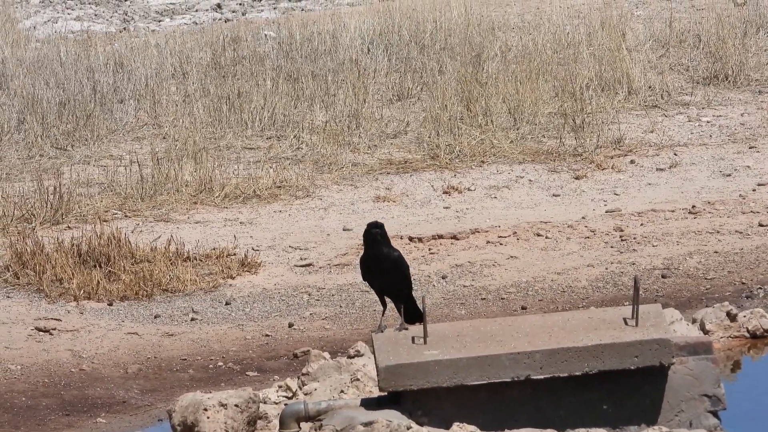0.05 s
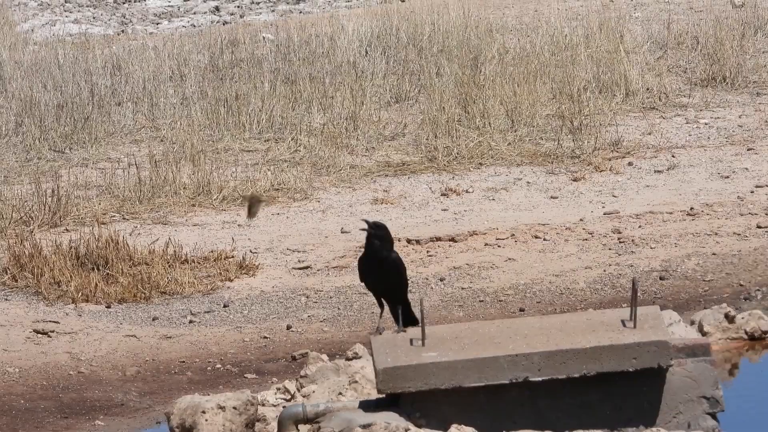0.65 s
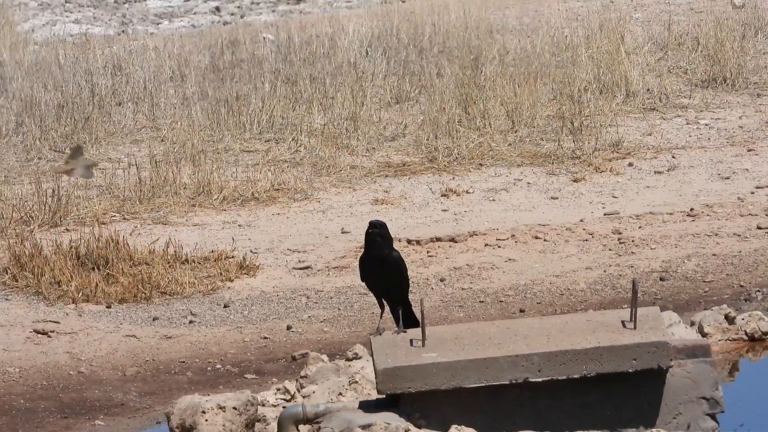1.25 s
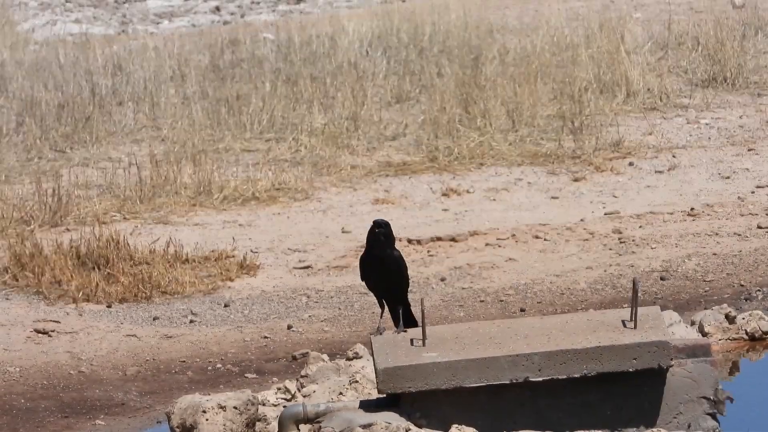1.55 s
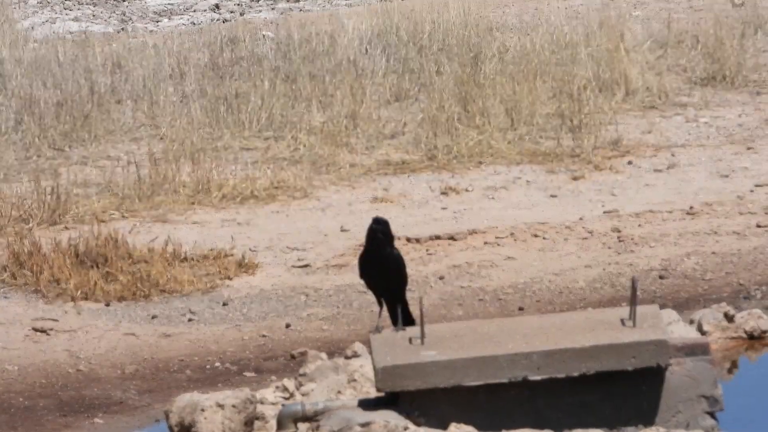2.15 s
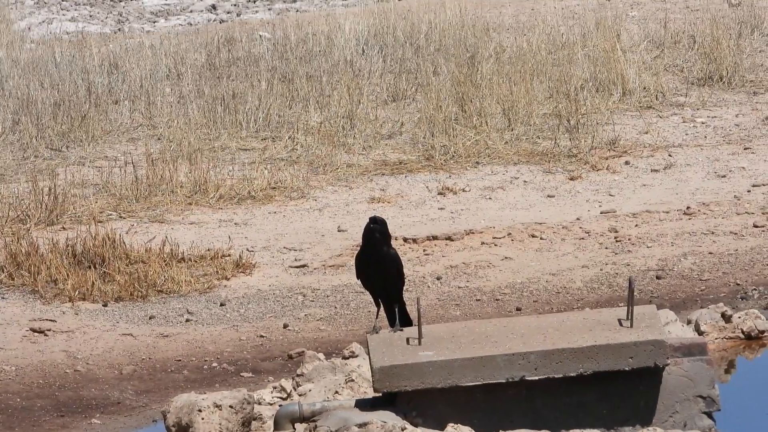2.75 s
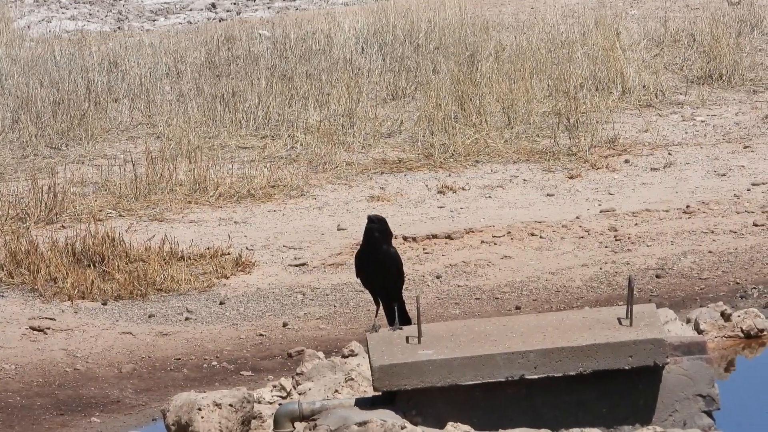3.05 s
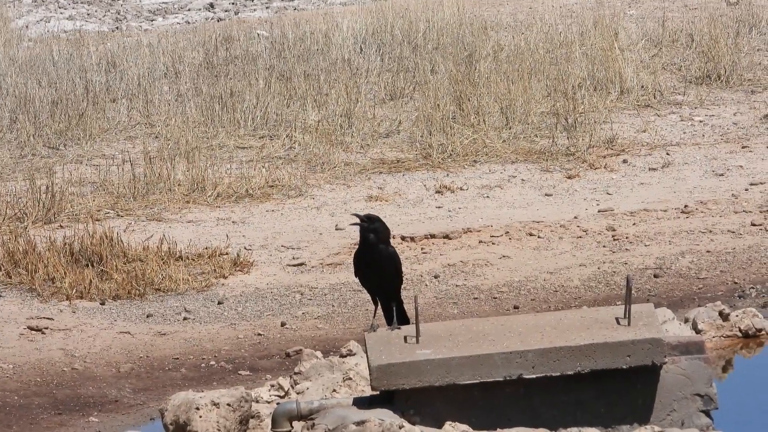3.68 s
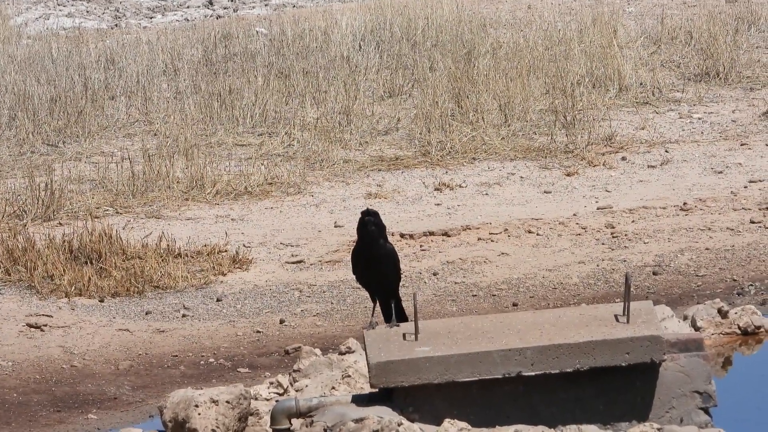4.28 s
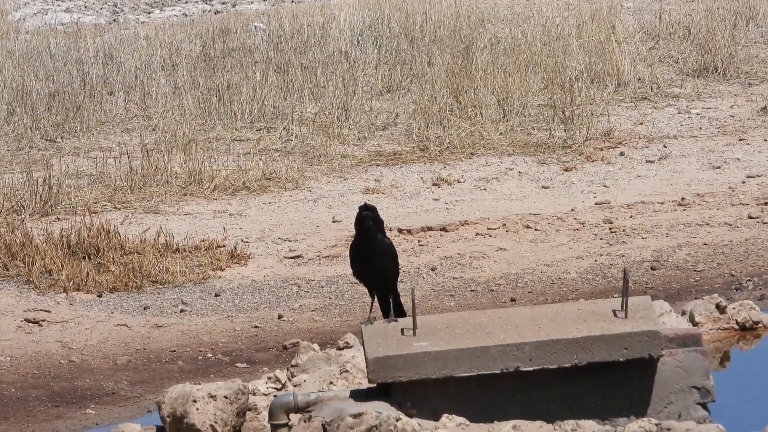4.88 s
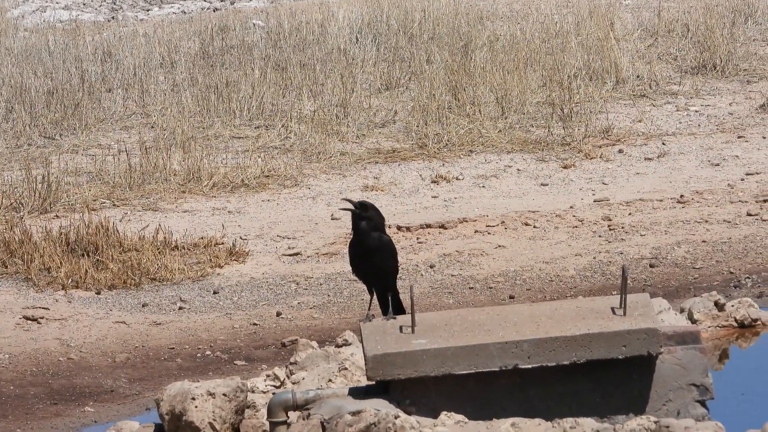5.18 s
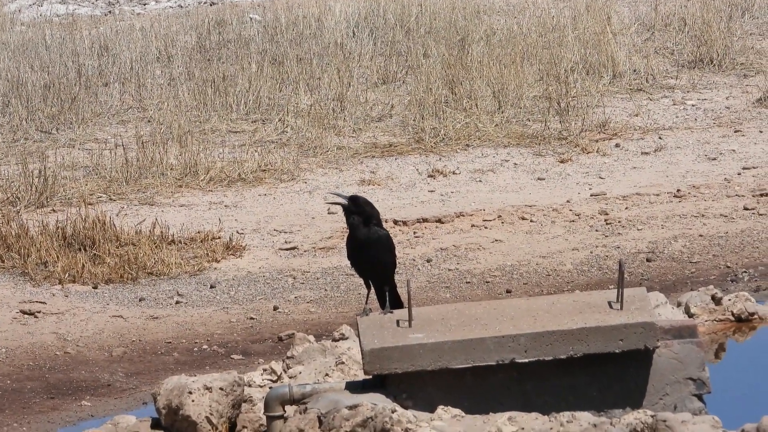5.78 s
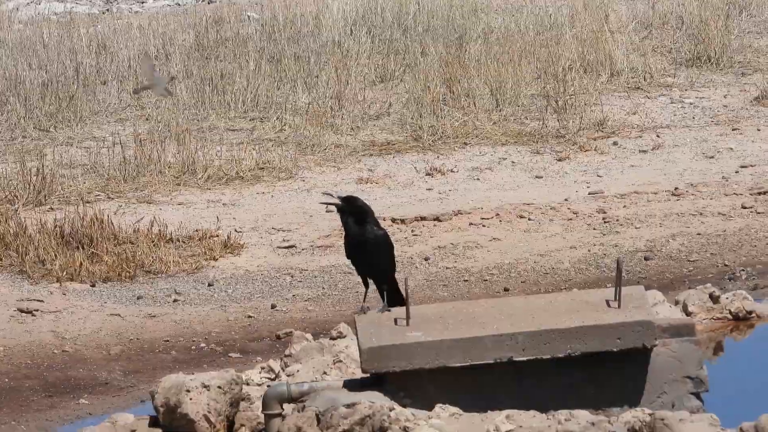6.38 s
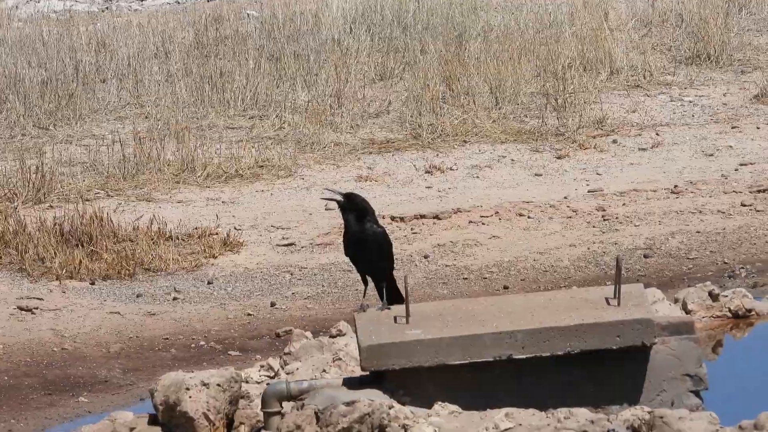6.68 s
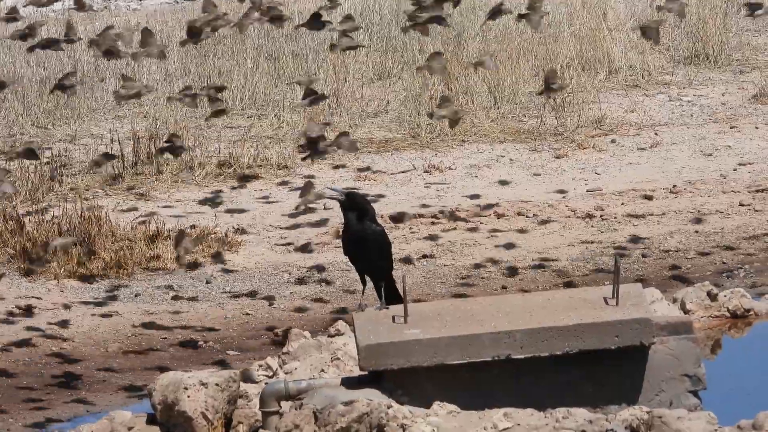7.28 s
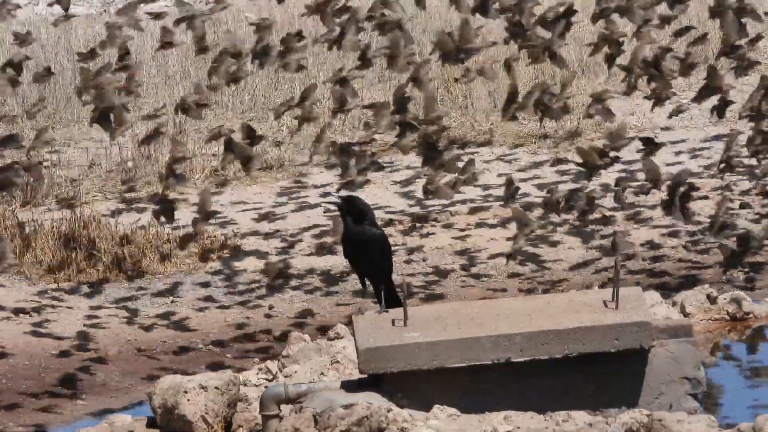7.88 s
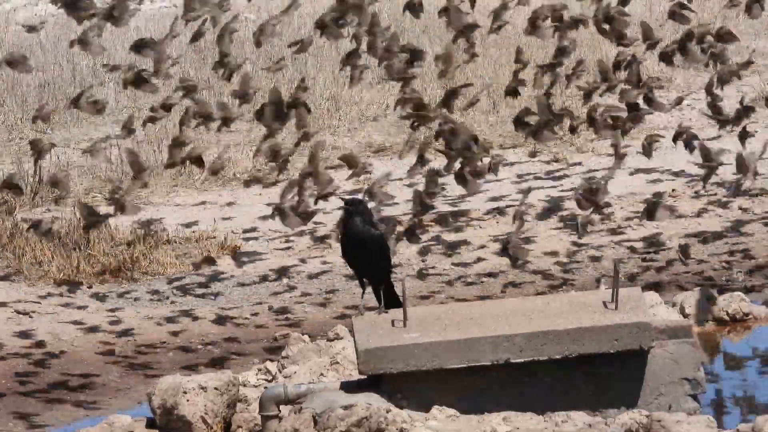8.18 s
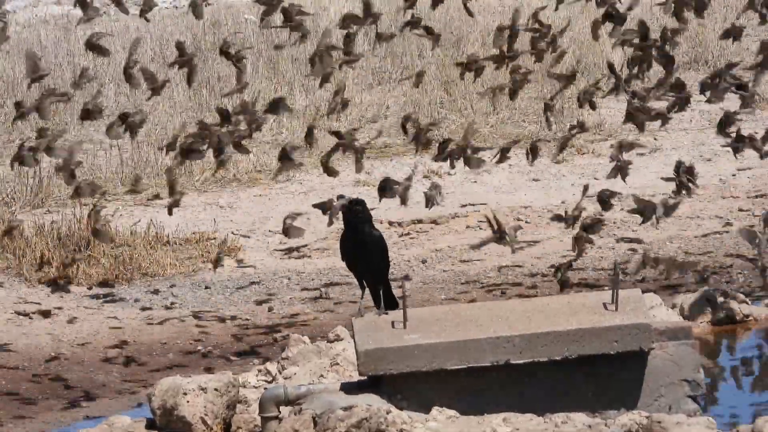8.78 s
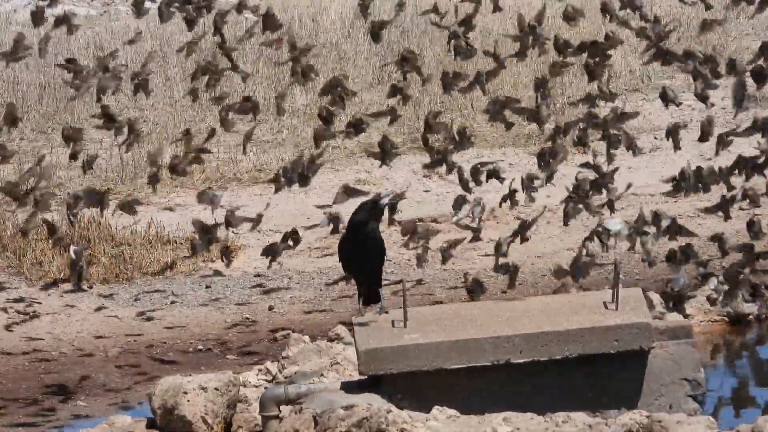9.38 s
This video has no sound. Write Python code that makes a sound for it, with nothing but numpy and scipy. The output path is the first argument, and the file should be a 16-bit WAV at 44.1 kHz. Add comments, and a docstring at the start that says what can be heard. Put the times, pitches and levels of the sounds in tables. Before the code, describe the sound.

A huge flock of small birds chirps densely outdoors, with a soft rush of wings swelling toward the end.

```python
"""Dry grass beside a waterhole, where a huge flock of small finches is chattering.
Thousands of far chirps, each a short gliding syrinx tone, merge with a noise haze into a seething chorus;
nearer whistles, rasps and harsh chirps stand out of it and scatter off the ground and the stems.
Wingbeats push out puffs of air, a rush that swells as part of the flock lifts and again as it streams
past, with a few close thuds. Faint low coos and a drone sit far behind."""
import sys
import numpy as np
from scipy import signal
from scipy.fft import rfft, irfft, next_fast_len
from scipy.io import wavfile
from scipy.ndimage import uniform_filter1d

SR = 44100
rng = np.random.default_rng(int(sys.argv[2]) if len(sys.argv) > 2 else 0)


def waveform_to_disk(signal):
    """Save audio, clipped to [-1, 1], as 16-bit WAV at the path in sys.argv[1]."""
    frames = np.transpose(np.atleast_2d(signal))
    scaled = np.clip(frames, -1, 1) * 32767
    samples = np.round(scaled).astype(np.int16)
    wavfile.write(sys.argv[1], SR, samples)


N = 420713
TIME = np.arange(N) / SR
FFT_SIZE = next_fast_len(N)
BIN_HZ = np.maximum(np.fft.rfftfreq(FFT_SIZE, 1 / SR), 1)

# Levels are set ahead of each layer's trim; pan is left minus right; EQ curves are relative.
# fader rides for three registers of the chorus: t/s, low/dB, middle/dB, high/dB
CHORUS_RIDES = [(0.0, -31.5, -30.5, -31), (0.74, -34.5, -31, -34), (1.09, -33.5, -31, -39),
                (1.41, -33.5, -28, -37), (2.2, -33.5, -32, -37.5), (3.3, -34, -32, -35),
                (3.6, -35, -33, -39.5), (4.4, -34.5, -31.5, -37.5), (5.87, -34.5, -33, -38),
                (6.24, -37, -36, -40), (6.6, -36.5, -34, -40.5), (8.03, -36, -34, -41),
                (8.58, -35, -32, -38), (9.22, -35.5, -31.5, -42.5), (9.54, -33, -31, -36.5)]
# crossovers between the low, middle, high and top registers: f/Hz
CROSSOVERS = (4110, 5400, 6510)
# tone colour of the chorus: f/Hz, level/dB
CHORUS_EQ = [(100, -70), (700, -40), (1000, -33), (1700, -21.5), (2120, -12.3), (2500, -12.7), (2750, -9),
             (3120, -2.7), (3400, -5.5), (3720, -2.5), (3970, -5.5), (4230, .5), (4650, -1), (5000, -1),
             (6000, -4), (6600, -12), (8000, -16), (9200, -27), (12000, -50)]
# how flight calls recolour the chorus: f/Hz, gain/dB
FLIGHT_CALL_EQ = [(1500, 4), (2300, 2.8), (2750, 1), (3100, -4), (3500, 0), (3800, 0), (4450, 2.5),
                  (4900, -.5), (5300, 0), (6100, -1.5), (7200, 1.8), (9000, 2)]
# how much of the flock is on the wing: t/s, share/0-1
AIRBORNE_SHARE = [(0, 0.42), (6.3, 0.07), (7.3, 0.35), (8.8, 0.86), (9.54, 0.5)]
# the flock sits mostly a little to the left: t/s, pan/dB
CHATTER_PAN = [(0, -0.1), (1.5, 0.5), (3.7, 1.5), (6.3, 1.5), (6.7, 1), (8.3, 0), (9.54, 0.5)]
# brief dips in the chatter: t/s, half-width/s, depth/dB
CHATTER_DIPS = [(1.02, 0.1, 0), (1.9, 0.054, 1.5), (3.87, .05, 0), (5.12, 0.075, 2.5), (6.69, 0.066, 5),
                (6.9, .04, 1.5), (7.05, .06, 0), (7.43, 0.057, 0.5), (7.63, .04, 2.5), (7.9, .1, 0),
                (8.33, 0.099, 1.5)]
# clean close whistles: t/s, length/s, f/Hz, glide/Hz, level/dB, arch/Hz, pan/dB
NEAR_WHISTLES = [(0.084, .28, 6930, -850, -31.5, 101, 10), (0.288, 0.23, 7960, -200, -29, 200, 3),
                 (0.498, 0.16, 5960, 67, -24.5, 51, 6), (0.874, 0.087, 5650, -150, -32.5, 18, -6),
                 (1.04, .11, 8850, -500, -48, 60, 2), (1.155, 0.049, 4910, -100, -33, 80, 3),
                 (1.92, 0.17, 5670, -120, -30.5, 3, 1), (1.927, 0.14, 8050, -200, -44, 60, 2),
                 (1.974, 0.31, 5350, -350, -34, 2, 1), (1.92, 0.11, 2980, -270, -35, 2, -1),
                 (2.33, .06, 8350, -200, -40, 50, 4), (2.5, 0.17, 5780, -200, -30, -300, -4),
                 (2.528, 0.096, 5440, -200, -30, -38, 3), (2.7, .09, 7700, 200, -40, 98, 4),
                 (2.74, 0.3, 3146, -62, -35, 52.5, 4), (3.17, .19, 7200, -500, -39, 0, -2),
                 (3.2, 0.26, 3105, -39, -39, 39, 3), (3.585, 0.3, 3120, -48, -37, 48, 2),
                 (3.27, .12, 6450, 3, -39, 200, -2), (3.94, 0.077, 4700, -900, -28.5, 0, 1),
                 (4.66, 0.1, 5230, 60, -31, 112, 2), (4.743, 0.083, 4990, -58, -23.5, -100, 1),
                 (5.11, 0.056, 6720, -600, -37, -50, -1), (5.23, 0.22, 8900, -500, -46, 124, -1),
                 (5.963, 0.17, 9100, -600, -46, 397, -2), (6.0, .13, 6000, 78, -33, 48, 5),
                 (6.124, 0.43, 6250, -20, -29, 250, 3), (6.247, .2, 5080, -400, -32.5, -170, 2),
                 (6.627, 0.175, 8100, -350, -41, 250, 2), (6.639, .19, 6250, -50, -31, 430, 2),
                 (6.622, 0.29, 3260, -58, -36, 69, 1), (6.752, .11, 4410, -80, -30.5, -3, -1),
                 (7.14, 0.068, 4390, -120, -26, -30, -1), (7.19, 0.1, 4350, -220, -33, -2, 1),
                 (7.19, 0.094, 5760, 63, -31, 60, 6), (7.278, 0.2, 5960, -120, -32.5, 248, 4),
                 (7.53, 0.1, 7720, -550, -42.5, -62, 9)]
# drawn-out buzzing calls: t/s, length/s, f/Hz, glide/Hz, level/dB, pan/dB, rasp depth/Hz
NEAR_RASPS = [(0.196, 0.24, 7550, 202, -37, -2, 400), (.53, .37, 10500, 100, -51, 2, 300),
              (.64, .08, 7900, -7, -39, 5, 250), (0.761, 0.25, 5800, -450, -34, 1, 303),
              (1.182, 0.1, 7080, -100, -34.5, 8, 200), (1.565, 0.13, 6470, -200, -33, 2, 302),
              (1.663, 0.11, 7600, 102, -38, 2, 280), (2.13, 0.1, 8050, 57, -41, 7, 280),
              (2.33, 0.05, 7100, -600, -35, 9, 230), (2.387, .13, 10450, 0, -51, 7, 200),
              (2.598, 0.21, 7030, 1295, -31.5, 3, 330), (3.04, 0.2, 7500, -400, -38, -2, 330),
              (3.29, .09, 10600, 0, -51, 6, 220), (3.3, .32, 8150, -100, -42, 2, 298),
              (3.75, 0.15, 6390, -100, -34.5, 0, 300), (3.979, 0.14, 5900, -500, -28.5, 2, 328),
              (4.38, 0.16, 5640, -200, -33, 1, 330), (4.629, 0.063, 5900, -400, -31, 1, 330),
              (4.77, 0.094, 8120, 100, -36, 2, 260), (5.261, .22, 6400, -4, -34.5, 0, 330),
              (5.42, 0.14, 7950, -400, -39, 4, 300), (5.928, 0.24, 5820, 300, -29, 1, 592),
              (6.172, 0.13, 5900, -200, -30, 10, 297), (6.429, 0.11, 5600, -200, -31, 6, 250),
              (8.238, .1, 6360, -800, -36.5, 6, 230), (8.518, 0.21, 5540, -300, -35.5, -13, 280),
              (8.7, 0.27, 7490, -200, -33, 13.5, 250)]
# harsh close chirps: t/s, length/s, f/Hz, glide/Hz, level/dB
NEAR_CHIRPS = [(0.062, 0.12, 4640, -500, -26.5), (0.413, 0.1, 4940, -400, -32),
               (0.565, 0.057, 4900, -400, -27), (0.747, 0.11, 4540, -400, -27.5),
               (1.144, 0.14, 4300, -300, -29), (1.332, 0.14, 4950, -200, -27),
               (1.541, 0.1, 4390, -150, -24), (1.677, 0.1, 4500, -200, -26.5),
               (1.943, 0.054, 4450, -400, -29), (2.848, 0.13, 4900, -500, -28),
               (2.971, 0.095, 4100, -300, -31), (3.106, 0.11, 4700, 300, -29),
               (3.291, 0.096, 5150, -300, -28), (3.363, 0.085, 3560, -250, -28),
               (3.75, 0.086, 4600, -400, -29), (4.402, 0.049, 5000, -400, -29),
               (4.647, 0.099, 4900, -200, -29), (4.954, 0.085, 4200, -300, -25),
               (5.168, 0.048, 3700, -200, -31), (5.265, 0.14, 5180, -300, -29.5),
               (5.42, 0.067, 4900, -400, -33), (5.57, 0.08, 4380, -450, -28),
               (5.862, 0.084, 5050, -200, -28), (5.872, 0.052, 3570, -200, -27),
               (6.457, 0.07, 4020, -750, -23), (6.543, 0.057, 4430, -150, -29),
               (6.751, 0.15, 4430, -100, -28), (6.79, 0.05, 5300, -900, -32),
               (6.924, 0.095, 4650, -550, -30), (7.108, 0.055, 5230, -1100, -27),
               (7.471, 0.12, 4450, -300, -28.5), (7.5, 0.055, 3640, -200, -27),
               (7.628, 0.098, 4650, -200, -29), (7.726, 0.063, 4330, -200, -21.5),
               (7.724, 0.085, 5250, -450, -28.5), (7.952, 0.13, 5900, -300, -34),
               (8.129, 0.1, 4400, -300, -28), (8.46, 0.083, 4560, -450, -25.5),
               (8.665, 0.11, 4620, -300, -27.5), (8.901, 0.075, 4110, -300, -26),
               (9.148, 0.07, 4460, -300, -27), (9.26, 0.066, 4500, -200, -27),
               (9.402, 0.12, 4500, -300, -26)]
# fader ride for the rush of wings: t/s, level/dB
RUSH_RIDE = [(0.0, -50.5), (0.74, -52), (1.17, -49), (2.8, -49), (3.96, -49), (4.78, -44.5), (5.29, -47.5),
             (5.53, -45.5), (5.87, -47.5), (6.08, -46), (6.27, -48), (7.54, -48), (9.54, -42)]
# tone colour of the rush: f/Hz, level/dB
RUSH_EQ = [(24, -63), (40, -36), (118, -11.5), (211, 4.5), (263, -5.5), (307, -0.5), (384, -2), (440, -3),
           (579, 0.5), (687, 1.5), (920, -4), (1020, -4.5), (1510, -1.5), (1650, -2.5), (2400, 0.5),
           (3120, -4.5), (5280, -120)]
# upper-mid lift of wings streaming past close by: f/Hz, gain/dB
FLYBY_EQ = [(250, -1), (700, -1.5), (1400, 4), (2400, 5.5), (3100, -15)]
# fader ride for the hiss of feathers and dry grass: t/s, level/dB
RUSTLE_RIDE = [(0.0, -57), (0.48, -56.5), (2.2, -58.5), (2.52, -57), (3.61, -59), (5.29, -54), (6.03, -56),
               (6.64, -60), (7.6, -57.5), (9.54, -57)]
# tone colour of that hiss: f/Hz, level/dB
RUSTLE_EQ = [(5000, -51), (8000, 5.5), (9700, 6.5), (10700, 3.5), (12000, -1), (13600, -11.5), (15000, -43)]
# thuds of close wings: t/s, f/Hz, level/dB
DOWNSTROKES = [(4.681, 435, -43), (8.08, 580, -38.5), (8.289, 328, -40), (8.8, 323, -38.5),
               (8.942, 204, -38), (9.1, 683, -37.5), (9.285, 654, -34), (9.29, 320, -39), (9.45, 207, -37),
               (9.48, 314, -34)]
# far low coos: t/s, length/s, f/Hz, glide/Hz, level/dB
FAR_COOS = [(0.638, 0.083, 320, 40, -49.5), (3.64, 0.29, 213, -22, -56.5), (3.86, 0.045, 207, 1, -67),
            (6.12, 0.081, 207, 4, -56), (6.97, 0.054, 196, -17, -49), (7.13, 0.086, 333, -24, -47),
            (8.26, 0.073, 213, -5, -53)]
# tone colour of the distant drone over the plain: f/Hz, level/dB
DRONE_EQ = [(30, -50), (70, -34), (110, -34), (150, 24.5), (212, 15), (250, -17), (400, -41)]
# how alike left and right sound: f/Hz, coherence/0-1
STEREO_COHERENCE = [(60, .35), (95, .4), (150, .78), (500, .76), (1300, .6), (3000, .6), (4800, .62),
                    (6200, .56), (7200, .42), (9000, .4), (12000, .2)]


def chorus(haze_db=2.5, low_db=2.08, middle_db=1.5, high_db=2.0, top_db=-42.0, swell_db=0.13):
    """The far flock: single chirps over the haze of countless farther ones, swelling by register."""
    birds = flurry(count=3600, band_hz=(1500, 9500), spread_db=2.8, rasp_hz=130, fall=.011)
    haze = rng.standard_normal((3, N))
    bed = widen(unit_rms(birds + from_db(haze_db) * haze[0]), haze[1:], CHORUS_EQ)
    # birds on the wing change to their flight calls
    airborne, = automation(AIRBORNE_SHARE)
    flight_calls = filtered(bed, from_db(over_hz(FLIGHT_CALL_EQ)))
    bed = bed + np.clip(airborne, 0, 1) * (flight_calls - bed)
    lowpasses = [1 / (1 + (BIN_HZ / hz) ** 40) for hz in CROSSOVERS]
    registers = np.diff(lowpasses, axis=0, prepend=0, append=1)
    low, middle, high = automation(CHORUS_RIDES)
    levels_db = (low + low_db + pan_offsets(2.0),  # the lowest voices sit further left
                 middle + middle_db,
                 high + high_db,
                 top_db + 0.69 * (high - high.mean()))  # the top rides with the high register
    return sum(from_db(level_db + swell_db * drift(12)) * levelled(filtered(bed, band))
               for level_db, band in zip(levels_db, registers))


def lulls():
    """Gain that ducks the chatter as many birds pause together."""
    dips = [point for s, half_s, depth_db in CHATTER_DIPS
            for point in ((s - half_s, 0), (s, -depth_db), (s + half_s, 0))]
    return from_db(automation(sorted(dips))[0])


def near_birds(whistle_db=-4.0, rasp_db=-3.5, chirp_db=-6.5, voice_send_db=-7.5, chirp_send_db=-2):
    """Whistles, rasps and harsh chirps of the closest birds, with brief echoes off the ground."""
    whistle_rows = [(*row, 55) for row in NEAR_WHISTLES]  # only 55 Hz of rasp
    rasp_rows = [(*row, 0, pan_db, rasp_hz) for *row, pan_db, rasp_hz in NEAR_RASPS]  # no arch
    whistles = calls(whistle_rows, quiver_per_s=1300, waver=.008, waver_per_s=42, flutter_db=2, edge=.14)
    rasps = calls(rasp_rows, quiver_per_s=1600, waver=.005, waver_per_s=69, flutter_db=1.2, edge=.15)
    voices = from_db(whistle_db) * whistles + from_db(rasp_db) * rasps
    chirps = from_db(chirp_db) * harsh_chirps()
    # the chirps come from within the grass, so more of their sound is scattered
    send = from_db(voice_send_db) * voices.mean(axis=0) + from_db(chirp_send_db) * chirps
    return filtered(voices + chirps, arrival_lag()) + grass_echo(send, t60_s=0.075)


def calls(rows, quiver_per_s, waver, waver_per_s, flutter_db, edge):
    """Single panned calls: the pitch arches, glides, wavers and quivers while the level flutters."""
    out = np.zeros((2, N))
    quiver, wander = drift(quiver_per_s), drift(waver_per_s)
    flutter = from_db(flutter_db * drift(70))
    for s, length_s, hz, glide_hz, level_db, arch_hz, pan_db, rasp_hz in rows:
        at = round(s * SR)
        span = slice(at, at + int(length_s * SR))
        shake = rasp_hz * quiver[span] + waver * hz * wander[span]
        foot_hz = hz - arch_hz
        tone = arched_tone(len(shake), foot_hz - glide_hz / 2, hz, foot_hz + glide_hz / 2, shake, edge)
        call = unit_rms(tone * flutter[span])
        for channel, side_db in zip(out, pan_offsets(pan_db)):
            mix_in(channel, at, from_db(level_db + side_db) * call)
    return out


def harsh_chirps(throb_db=4.5, sweep_hz=70, rasp_hz=205):
    """Hoarse tones that swell, glide (nearly all downward) and fade, with a slight, fast throb."""
    out, quiver = np.zeros(N), drift(1700)
    for s, length_s, hz, glide_hz, level_db in NEAR_CHIRPS:
        at, length = round(s * SR), int(length_s * SR)
        pace, start = rng.random(2)
        throb_hz = 68 * (0.86 + 0.433 * pace)
        phase = 2 * np.pi * (start + throb_hz * TIME[:length])
        shake = rasp_hz * quiver[min(at, N - length):][:length] - sweep_hz * np.sin(phase)
        tone = arched_tone(length, hz - glide_hz / 2, hz, hz + glide_hz / 2, shake, edge=.22)
        throb = from_db(-throb_db * np.sin(phase / 2) ** 2)
        mix_in(out, at, from_db(level_db) * unit_rms(tone * throb))
    return out


def midground_birds(slur_db=-40, peep_db=-42.5, twitter_db=-46, overtone_db=-60, echo_db=-3):
    """Birds at middle distance: falling slurs throughout, and resting calls that fade before the flyby."""
    peeps = flurry(count=260, band_hz=(2980, 3240), spread_db=1.6, rasp_hz=55, fall=.008)
    slurs = flurry(count=300, band_hz=(3700, 6100), spread_db=2.0, rasp_hz=80, fall=.03, typical_s=.04)
    twitter = flurry(count=320, band_hz=(6400, 8400), spread_db=2.2, rasp_hz=300, fall=.015)
    overtones = flurry(count=260, band_hz=(8400, 11000), spread_db=2.2, rasp_hz=220, fall=.012,
                       typical_s=.05)
    resting = from_db(peep_db) * peeps + from_db(twitter_db) * twitter + from_db(overtone_db) * overtones
    resting *= from_db(np.interp(TIME, (5.5, 7.7), (0, -18)))
    high_db = automation(CHORUS_RIDES)[2]
    ride = from_db(0.45 * (high_db - high_db.mean()))  # follows the chorus's high register
    voices = (resting + from_db(slur_db) * slurs) * ride
    return filtered(voices, arrival_lag()) + from_db(echo_db) * grass_echo(voices, t60_s=0.03)


def wings(rush_trim_db=2.5, beat_db=1.2, usual_share=0.37, rustle_trim_db=5.0, flicker_db=2.5):
    """Overlapping wingbeats push out puffs of air; feathers and dry grass hiss on top."""
    rush_db, = automation(RUSH_RIDE)
    rustle_db, = automation(RUSTLE_RIDE)
    airborne, = automation(AIRBORNE_SHARE)
    puffs = flurry(count=1200, band_hz=(150, 1900), spread_db=2.4, rasp_hz=40, fall=.01, typical_s=.028)
    beating = from_db(rush_db + rush_trim_db + beat_db * drift(45))
    rush = beating * noise_bed(RUSH_EQ, grains=from_db(-15) * puffs)
    # the rush brightens when more birds fly than usual
    flyby = filtered(rush, from_db(over_hz(FLYBY_EQ)))
    rush = rush + (airborne - usual_share) * (flyby - rush)
    rustle = from_db(rustle_db + rustle_trim_db + flicker_db * drift(23)) * noise_bed(RUSTLE_EQ)
    return rush + rustle


def wing_thuds(length_s=0.066):
    """A close downstroke is a soft push of air: a short low tone that sags in pitch and comes back."""
    out, length = np.zeros(N), int(length_s * SR)
    shake_hz = 25 * drift(203)
    for s, hz, level_db in DOWNSTROKES:
        at = round(s * SR) - length // 2
        thud = arched_tone(length, 1.1 * hz, hz, 1.11 * hz, shake_hz[at - length:at], edge=0.7)
        mix_in(out, at, from_db(level_db) * thud)
    return out


def far_coos(arch=0.014, rasp_hz=6.3):
    """Soft, fluttering low calls from far off, panned centre."""
    rows = [(s, length_s, hz, glide_hz, level_db, arch * hz, 0, rasp_hz)
            for s, length_s, hz, glide_hz, level_db in FAR_COOS]
    return calls(rows, quiver_per_s=150, waver=0.017, waver_per_s=45, flutter_db=8.0, edge=0.19)


def far_drone(level_db=-67.0):
    """A faint band of low noise hanging over the plain."""
    return from_db(level_db) * noise_bed(DRONE_EQ)


def grass_echo(x, t60_s):
    """Ground and stems return a short spray of echoes, a different one to each side."""
    t = TIME[:SR // 2]
    echoes = rng.standard_normal((2, len(t))) * from_db(-60 * t / t60_s)
    echoes /= np.sqrt(np.sum(echoes ** 2, axis=1, keepdims=True))
    return signal.fftconvolve(x[None], echoes, axes=1)[:, :N]


def flurry(count, band_hz, spread_db, rasp_hz, fall, typical_s=.045):
    """A cloud of short, raspy, mostly falling tones at random moments, pitches and levels."""
    out, quiver = np.zeros(N), drift(450)
    low_hz, high_hz = band_hz
    placings = rng.random((count, 4)).tolist()
    shapes = rng.standard_normal((count, 4)).clip(-2, 2).tolist()
    for (when, pitch, quiver_start, rasp), (size, loud, slope, bend) in zip(placings, shapes):
        length = int(SR * typical_s * np.exp(0.44 * size))
        hz = low_hz + (high_hz - low_hz) * pitch
        glide = hz * (fall + 0.01993 * slope)
        shake = rasp_hz * rasp * quiver[int(quiver_start * (N - length)):][:length]
        tone = arched_tone(length, hz + glide, hz * (1 + 0.0199 * bend), hz - glide, shake, edge=0.088)
        mix_in(out, int(when * (N + length)) - length, from_db(spread_db * loud) * tone)
    return unit_rms(out)


def arched_tone(length, start_hz, middle_hz, end_hz, quiver_hz, edge):
    """A sine on an arched pitch path; fast quiver makes it rasp. `edge` is fade time over length."""
    u = np.linspace(0, 1, length)
    arch_hz = middle_hz - (start_hz + end_hz) / 2
    hz = start_hz + (end_hz - start_hz) * u + arch_hz * (1 - (2 * u - 1) ** 2) + quiver_hz
    swell = np.minimum(np.minimum(u, 1 - u) / edge, 1)
    return swell * np.sin(2 * np.pi / SR * np.cumsum(hz))


def noise_bed(eq, grains=0):
    """Coloured stereo noise at unit power, with any grains mixed into its direct part."""
    white = rng.standard_normal((3, N))
    return unit_rms(widen(unit_rms(white[0] + grains), white[1:], eq))


def widen(direct, scattered, eq):
    """Blend direct sound with scattered sound that differs on each side, both through one EQ."""
    alike = np.clip(over_hz(STEREO_COHERENCE), 0, 1)
    focused = rfft(direct, FFT_SIZE) * np.sqrt(alike) * arrival_lag()
    diffuse = rfft(scattered, FFT_SIZE) * np.sqrt(1 - alike)
    return irfft((focused + diffuse) * from_db(over_hz(eq)), FFT_SIZE)[:, :N]


def arrival_lag(lag_s=5.2e-5):
    """Phase turn per channel: the flock lies to the left, so the right hears it late."""
    return np.exp(-2j * np.pi * BIN_HZ * lag_s * np.array([[0], [1]]))


def levelled(x, window=SR // 12):
    """Hold unit power from moment to moment: a great many voices leave no gaps."""
    return x / np.sqrt(uniform_filter1d(np.mean(x ** 2, axis=0), window) + 1e-20)


def drift(rate):
    """A random modulator of spread about 1 that turns `rate` times a second."""
    turns = rng.standard_normal(N // 24)
    return 1.2 * np.interp(TIME * rate, np.arange(len(turns)), turns)


def automation(rows):
    """One sample-by-sample lane for each column after the time."""
    s, *columns = np.transpose(rows)
    return [np.interp(TIME, s, column) for column in columns]


def over_hz(points):
    """Breakpoints joined by straight lines over log frequency."""
    hz, value = np.transpose(points)
    return np.interp(np.log(BIN_HZ), np.log(hz), value)


def filtered(x, gain):
    """Apply a gain per frequency."""
    return irfft(rfft(x, FFT_SIZE) * gain, FFT_SIZE)[..., :N]


def mix_in(out, at, sound):
    """Drop a sound in at a sample, trimmed to the scene."""
    first, last = max(at, 0), min(at + len(sound), N)
    if last > first:
        out[first:last] += sound[first - at:last - at]


def pan_offsets(pan_db):
    """Split a pan into left and right offsets in dB."""
    return pan_db * np.array([[.5], [-.5]])


def from_db(db):
    """Decibels to gain."""
    return 10 ** (np.asarray(db) / 20)


def unit_rms(x):
    """Scale to unit power."""
    return x / np.sqrt(np.mean(x ** 2) + 1e-20)


def scene(pan_trim_db=-0.45):
    """The flock and its nearest birds up front, then its wings and the open plain."""
    pan_db, = automation(CHATTER_PAN)
    chatter = (chorus() + midground_birds()) * lulls()
    birds = (chatter + near_birds()) * from_db(pan_offsets(pan_db + pan_trim_db))
    return birds + wings() + wing_thuds() + far_drone() + far_coos()


def record(dry, stopband_hz=16000):
    """A steep high cut on the whole mix."""
    return signal.sosfilt(signal.cheby2(16, 70, stopband_hz, fs=SR, output="sos"), dry)


dry = scene()
out = record(dry)
waveform_to_disk(out)
```